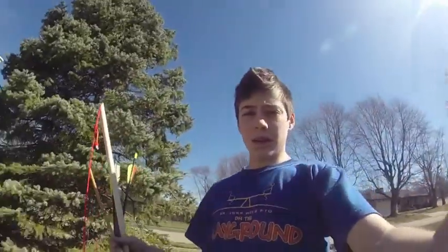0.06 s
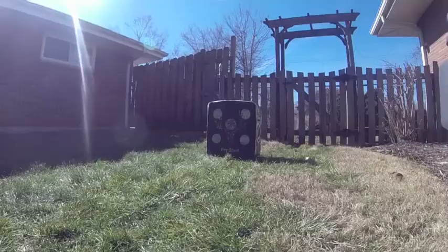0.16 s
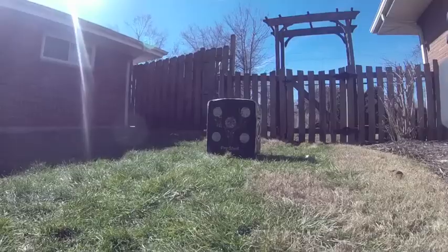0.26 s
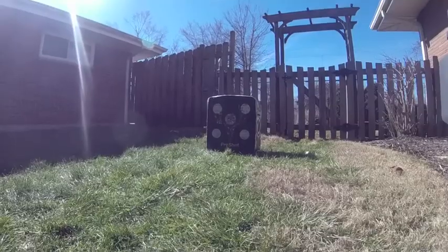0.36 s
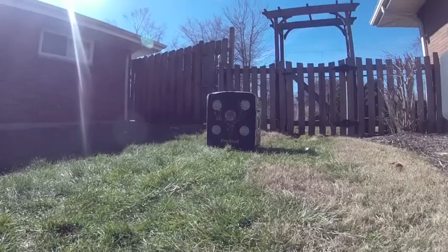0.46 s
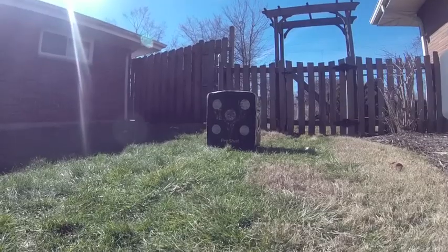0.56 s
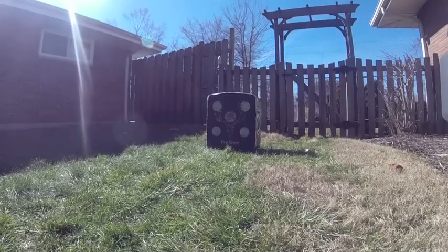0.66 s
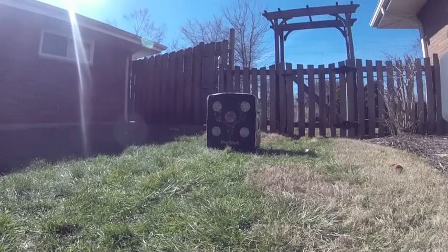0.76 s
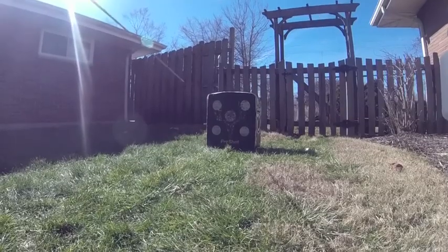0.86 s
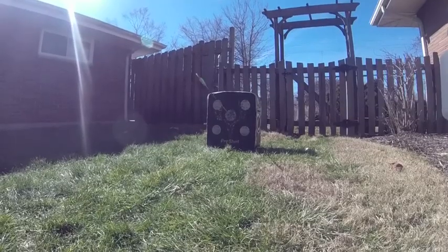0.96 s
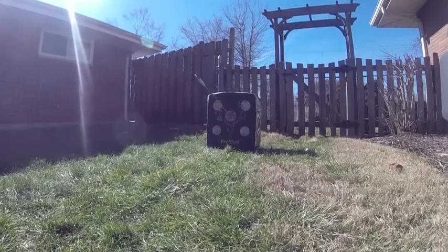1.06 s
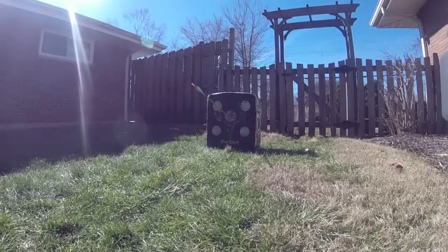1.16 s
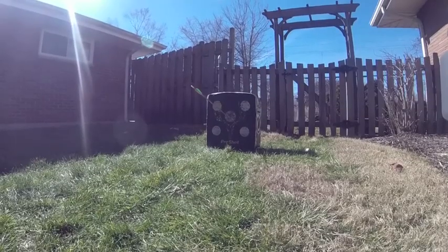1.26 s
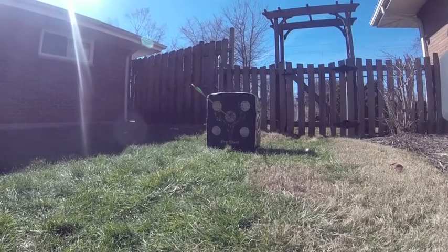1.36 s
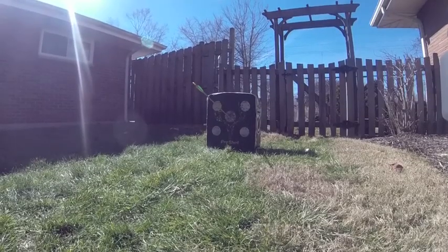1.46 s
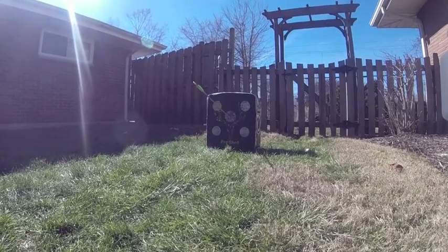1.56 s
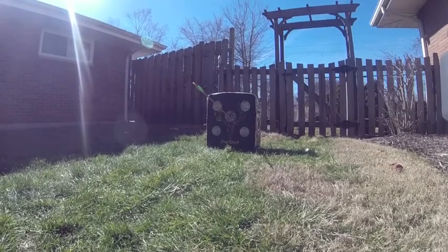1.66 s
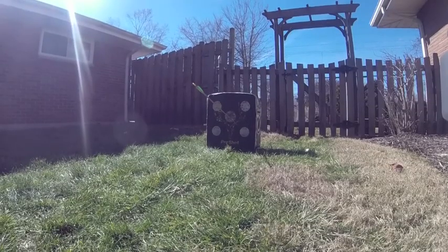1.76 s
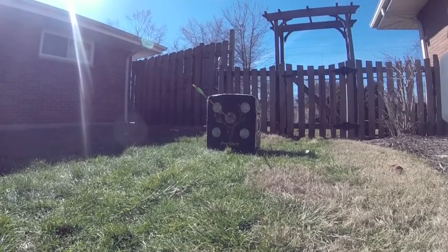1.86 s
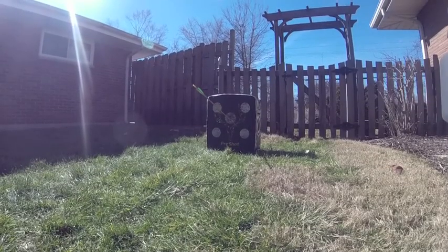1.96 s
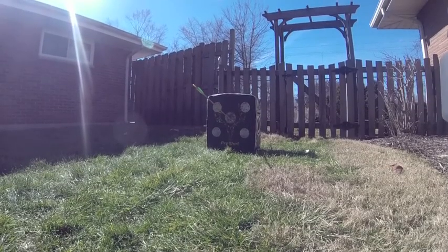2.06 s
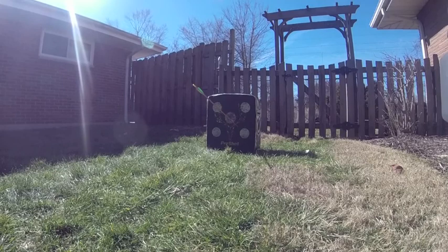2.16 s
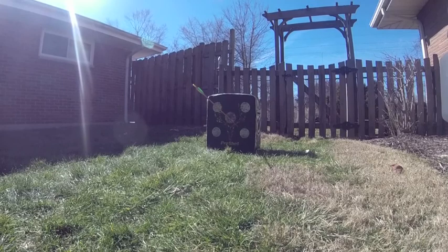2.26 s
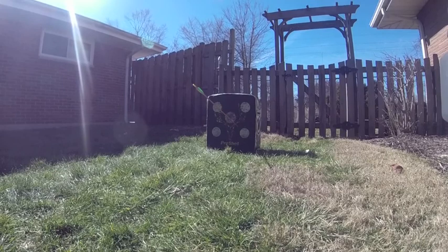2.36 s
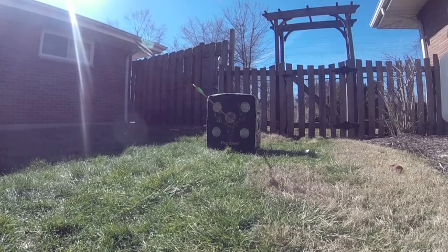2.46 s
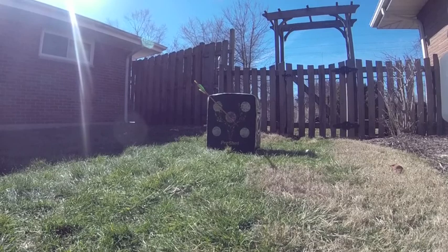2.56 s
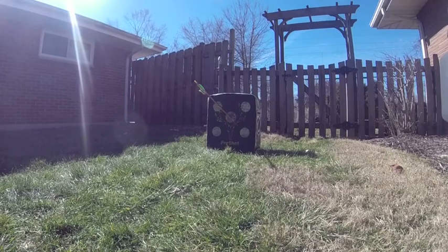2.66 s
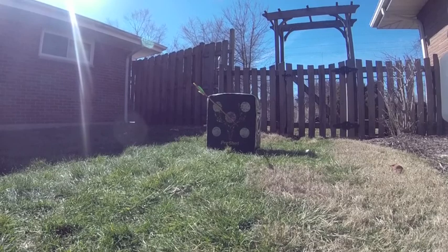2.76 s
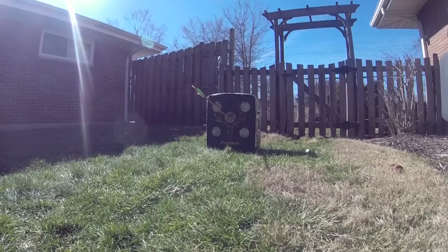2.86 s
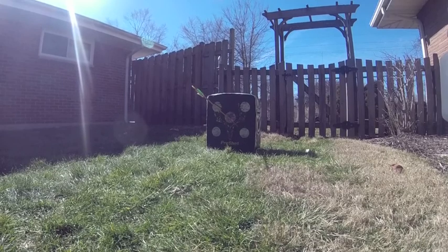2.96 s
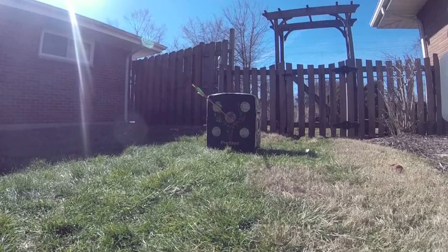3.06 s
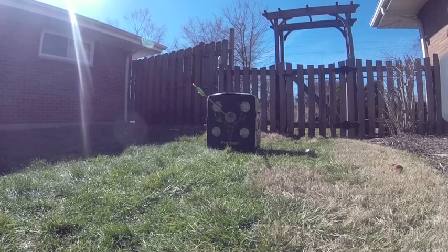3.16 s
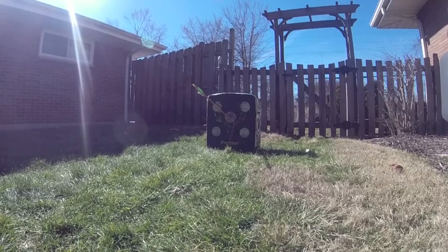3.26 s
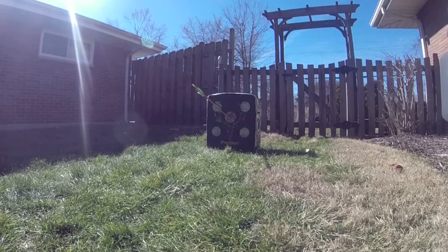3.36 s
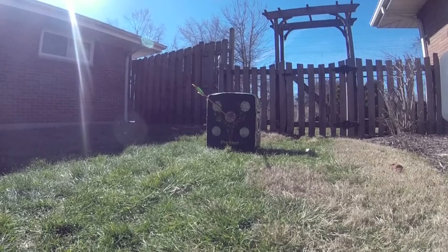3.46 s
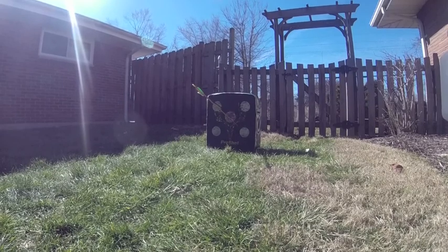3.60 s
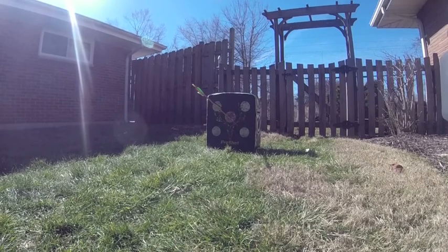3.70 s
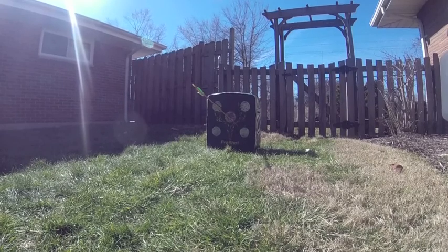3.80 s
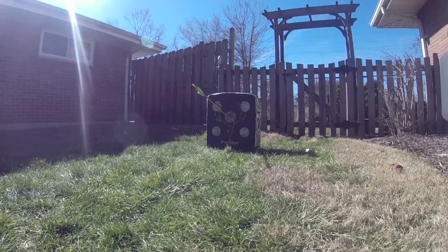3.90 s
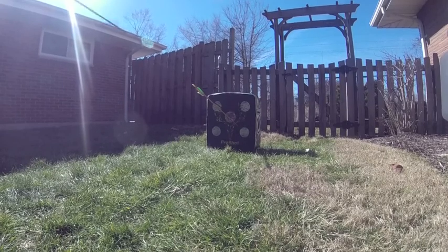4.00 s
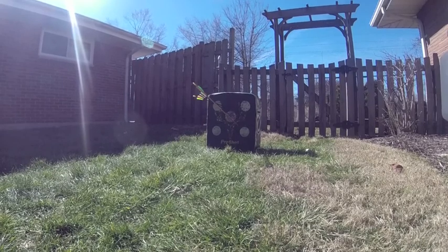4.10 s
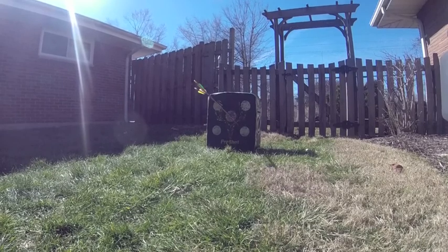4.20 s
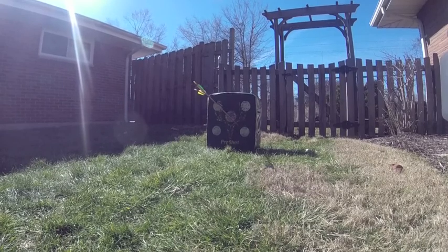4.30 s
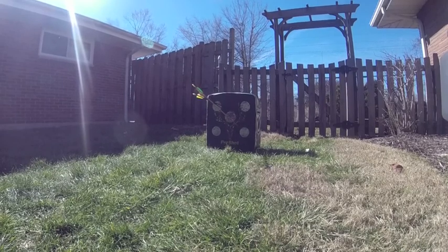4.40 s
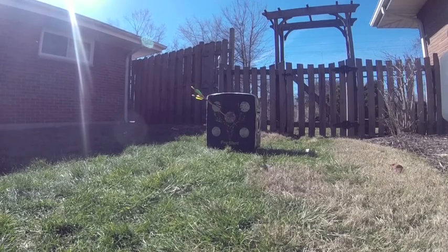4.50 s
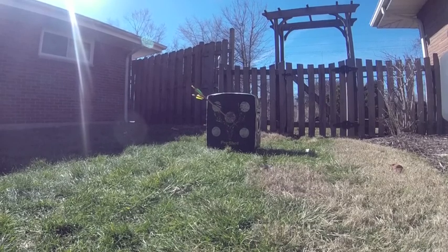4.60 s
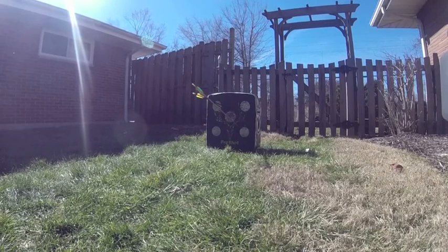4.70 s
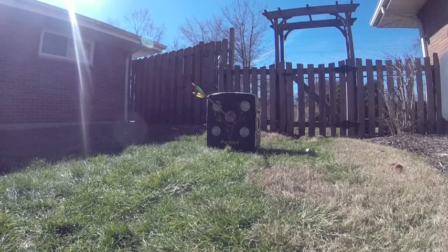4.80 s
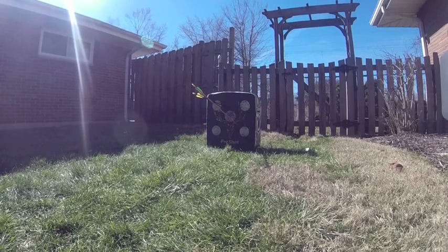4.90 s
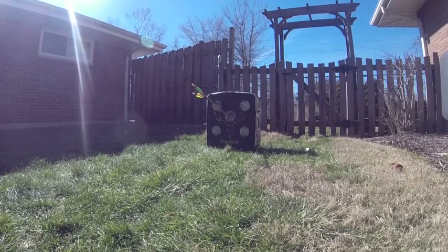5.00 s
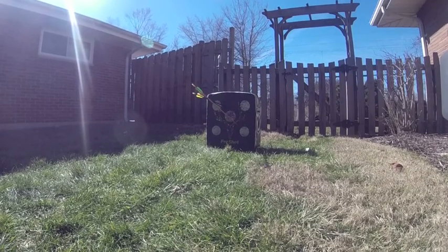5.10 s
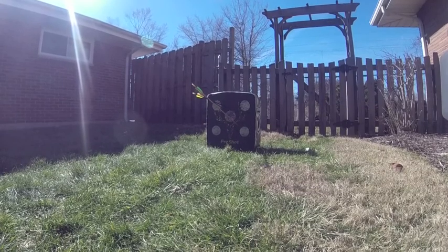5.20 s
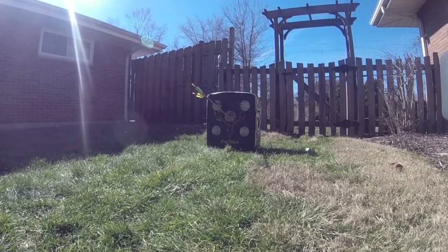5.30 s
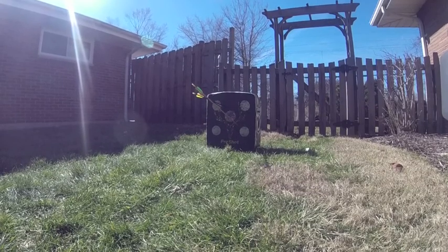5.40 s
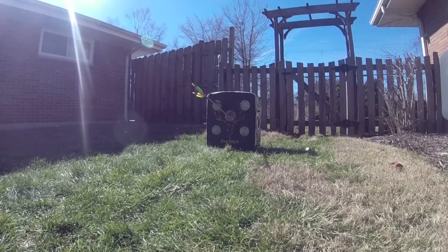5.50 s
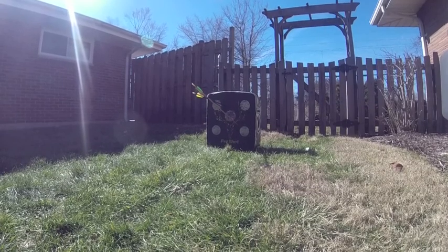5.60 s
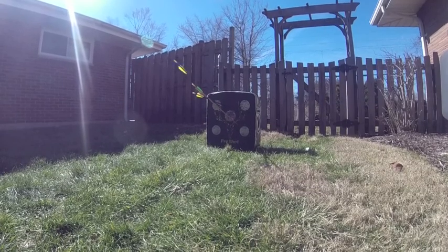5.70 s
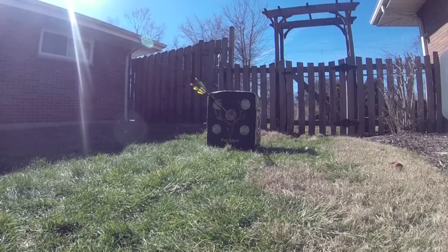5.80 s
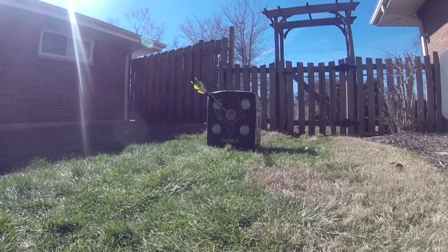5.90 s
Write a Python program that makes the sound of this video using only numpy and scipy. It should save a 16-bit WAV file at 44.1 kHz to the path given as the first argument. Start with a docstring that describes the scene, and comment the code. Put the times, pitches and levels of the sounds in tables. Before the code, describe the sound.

At the very start a finger presses a button on a small plastic camera case, right at the microphone: a low push and rocking bump, faint gritty rubbing, then a sharp, loud snap at 0.13 s, cut off at about 0.18 s. A quiet yard fades in, with smooth far traffic, air and hiss. At 0.82 s an arrow chatters and scrapes off the bow with a tiny squeak, then smacks into foam at 0.93 s with the fullest thud. The background dips near 1.9 s. A second shot scrapes and squeals most clearly at 2.4 s and hits at 2.51 s. After a dip at 3.5 s, the third scrapes at 3.95 s, strikes at 4.08 s and rattles brightly against a standing arrow until about 4.2 s. Another dip at 5 s; the fourth scrapes more softly at 5.59 s, lands at 5.74 s and ticks faintly until 5.95 s. Short dull reflections follow every shot.

```python
"""Arrows into foam, quiet yard

A button snaps on a small camera's plastic case, close on its microphone: ringing modes, a slow push, rubbing noise.
Then the camera lies in the yard for four takes joined by short fades. In each, an arrow scrapes and chatters off
the bow (noise swarms through shaft modes, at times singing sines), flies a tenth of a second and smacks into a
foam block (bright grit, a thud of block modes), where its shaft may rattle against the arrows already there.
Dull echoes of fence and walls follow each shot, over smooth noise of far traffic, air and hiss."""
import sys
import numpy as np
from scipy import signal
from scipy.fft import rfft, irfft
from scipy.io import wavfile
from scipy.ndimage import uniform_filter1d

SR = 44100
rng = np.random.default_rng(int(sys.argv[2]) if len(sys.argv) > 2 else 0)


def digitize_waveform(pressure):
    """Quantize a signal to 16-bit integers and store it at the path in sys.argv[1].

    Rows of a 2-D input are taken as channels; values are limited to [-1, 1].
    """
    field = np.atleast_2d(pressure).T
    bounded = np.clip(field, -1, 1)
    quanta = np.round(bounded * 32767).astype(np.int16)
    wavfile.write(sys.argv[1], SR, quanta)


N = 262350
T = np.arange(N) / SR

# the loudest slips of the shaft over the bow: (time [s], loudest level [dB], centre [Hz])
SLIPS = [(0.821, -43, 3230), (0.826, -33, 3280), (0.835, -37.5, 3050), (0.8457, -35.5, 3000),
         (0.854, -35.5, 3500), (0.8997, -42.5, 3500), (2.392, -43, 2300), (2.4009, -33, 2900),
         (2.4279, -28.5, 3140), (3.9486, -43, 3300), (3.9572, -34, 3160), (3.9853, -48, 2160),
         (5.5854, -45.5, 3170), (5.5954, -43, 2120), (5.5996, -36, 2160)]
# runs of small uneven slips: (start [s], end [s], first slip level [dB], last slip level [dB], centre [Hz])
DRAGS = [(0.800, 0.820, -57, -53, 2600), (0.848, 0.863, -42, -43, 3000), (2.403, 2.469, -44, -51, 2600),
         (3.958, 3.998, -43.5, -51.5, 2300), (5.604, 5.644, -45, -56, 2300)]
SLIP_T60_S, DRAG_T60_S = .03, .04
DRAG_GAP_S, DRAG_SPREAD_DB = .006, 2.5    # mean gap, spread of strength


def scrape():
    """The shaft sticks and slips along the bow, amid runs of smaller slips before, between and after."""
    out = np.zeros(N)
    for s, level_db, hz in SLIPS:
        add(out, s - .001, contact(level_db, hz, SLIP_T60_S, rise=.00055, ring_db=-5.5))
    for start, end, first_db, last_db, hz in DRAGS:
        luck = rng.standard_normal((14, 2))    # uneven timing, uneven strength
        times = start + DRAG_GAP_S * (np.arange(len(luck)) + .25 * luck[:, 0])
        levels_db = np.interp(times, [start, end], [first_db, last_db]) + DRAG_SPREAD_DB * luck[:, 1]
        for s, db in zip(times, levels_db):
            if s < end:
                add(out, s, contact(db, hz, DRAG_T60_S, rise=.001, ring_db=-7.0))
    return out


# the singing shaft: (start [s], hold [s], level [dB], pitch [multiple of the free modes])
SQUEALS = [(0.8213, 0.0084, -32, 1.052), (2.399, 0.023, -30, 1.0), (3.956, .004, -38, 1.04)]
# singing strength of five shaft modes: (level [dB])
SQUEAL_SHARE_DB = [-22, 0, -11.5, -16, -18]
SQUEAL_ATTACK_S = .002
SQUEAL_DROP_DB, SQUEAL_DAMP_S, SQUEAL_T60_S = -11, .004, .09    # damping depth and time; ring of the rest


def squeal():
    """Five shaft modes sing as sines, drop quickly as the shaft is damped, and ring out."""
    out, t = np.zeros(N), T[:6000]
    singing_hz = [SHAFT_MODES[k][0] for k in (0, 3, 5, 6, 8)]
    for s, hold, level_db, pitch in SQUEALS:
        damped = np.maximum(t - hold, 0)
        fall_db = SQUEAL_DROP_DB * np.minimum(damped / SQUEAL_DAMP_S, 1) - 60 * damped / SQUEAL_T60_S
        song = 0
        for hz, share_db in zip(singing_hz, SQUEAL_SHARE_DB):
            song = song + amp(share_db) * np.sin(2 * np.pi * (pitch * hz * t + rng.random()))
        swell = np.minimum(t / SQUEAL_ATTACK_S, 1)
        add(out, s, swell * amp(level_db + fall_db) * song)
    return out


# arrow enters the foam: (time [s], smack level [dB], smack centre [Hz], thud peak [dB], thud centre [Hz])
SMACKS = [(0.93, -33.5, 3400, -33.5, 235), (2.5125, -34.5, 2100, -39, 255), (4.0804, -34, 2870, -40, 700),
          (5.7354, -35, 2960, -41.5, 310)]
SMACK_HOLD_S, SMACK_T60_S = .0032, .018
QUIVER_DB, QUIVER_HZ, QUIVER_T60_S = -14, 2500, .16    # level relative to the smack


def smack():
    """The tip grinds in at full strength and stops; the shaft goes on quivering in the foam."""
    out = np.zeros(N)
    for s, smack_db, hz, _, _ in SMACKS:
        add(out, s - .001, contact(smack_db, hz, SMACK_T60_S, rise=.00019, ring_db=-4.5, hold=SMACK_HOLD_S))
        add(out, s, contact(smack_db + QUIVER_DB, QUIVER_HZ, QUIVER_T60_S, rise=.0018, ring_db=1.0))
    return out


# foam block modes: (frequency [Hz], level [dB])
BLOCK_MODES = [(110, -9), (180, -4), (270, 0), (450, -1), (650, -5), (900, -8), (1250, -11), (1850, -14)]
BLOCK_CYCLES = 4.5    # each mode falls 60 dB in this many cycles
THUD_RISE_S, THUD_T60_S, THUD_LOW_HZ, THUD_TOP_HZ = .0016, .083, 127, 2000


def thud():
    """Foam grips the shaft in jerks that drive the block's modes; the thud builds over a few ms."""
    out = np.zeros(N)
    band = signal.butter(1, [THUD_LOW_HZ, THUD_TOP_HZ], "band", fs=SR)
    for s, _, _, thud_db, thud_hz in SMACKS:
        jerks = rng.standard_normal(6000) * amp(4.3 * rng.exponential(1, 6000))
        braking = jerks * dying(THUD_T60_S, THUD_RISE_S, size=6000)
        block = 0
        for f, db in BLOCK_MODES:
            weight = amp(db - abs(np.log2(f / thud_hz)))    # modes fade away from the centre
            block = block + weight * rms_one(ring(braking, f, BLOCK_CYCLES / f))
        block = signal.lfilter(*band, block)
        add(out, s + .00115, amp(thud_db) * block / np.abs(block).max())
    return out


# shaft knocks on its neighbours: (time [s], loudest level [dB], centre [Hz])
RATTLES = [(4.1007, -32, 5170), (4.126, -38.5, 5200), (4.155, -40.5, 4760), (4.1762, -41.5, 4500),
           (5.7802, -49, 2910), (5.791, -47, 2870), (5.8087, -49, 4830), (5.8307, -40.5, 4500),
           (5.8537, -47, 5360), (5.923, -43.5, 5300), (5.9424, -49, 5260)]
RATTLE_HOLD_S, RATTLE_T60_S = .0016, .03
FREE_HZ, FREE_DB, FREE_T60_S = 8750, -25, .06    # level relative to the knock


def rattle():
    """The shaft knocks on standing arrows; a high mode of theirs rings on after each knock."""
    out = np.zeros(N)
    free_ring = np.sin(2 * np.pi * FREE_HZ * T[:4000]) * dying(FREE_T60_S, .00075)
    for s, level_db, hz in RATTLES:
        knock = contact(level_db, hz, RATTLE_T60_S, rise=.0003, ring_db=-5.5, hold=RATTLE_HOLD_S)
        add(out, s - .0005, knock)
        add(out, s, amp(level_db + FREE_DB) * free_ring)
    return out


# free modes of the arrow shaft: (frequency [Hz], level [dB])
SHAFT_MODES = [(1836, -7), (2218, -4), (2750, -3), (3165, -1), (3500, -2), (3892, -5), (4678, -3),
               (5200, -4), (5620, -4), (6300, -7), (7041, -10), (8613, -14)]
# colour of the bare contact noise: (frequency [Hz], relative level per Hz [dB])
CONTACT_COLOUR = [(900, -19), (1500, -9), (2200, -4), (3200, 2), (4000, -2.5), (5500, 6), (6800, -4.5),
                  (8000, -11.5), (12000, -20), (16000, -37)]
SHAFT_T60_S = .012


def contact(level_db, hz, t60, rise, ring_db, hold=0):
    """A swarm of tiny clicks, strongest near hz, heard directly and through the shaft's modes."""
    size = 4000

    def near(f):
        return -9.0 * np.log2(f / hz) ** 2    # the contact favours pitches near its own

    grit = rng.standard_normal(size) * amp(rng.exponential(1, size))
    spectrum = [(f, db + max(near(f), -5.0)) for f, db in CONTACT_COLOUR]
    grit = colour(grit, spectrum) * dying(t60, rise, hold=hold)
    # each grip on the shaft weights [dB] and shifts [share of pitch] its modes anew
    luck = rng.standard_normal((len(SHAFT_MODES), 2)) * [3, .04]
    rings = 0
    for (f, db), (extra_db, shift) in zip(SHAFT_MODES, luck):
        rings = rings + amp(db + near(f) + extra_db) * ring(grit, f * (1 + shift), SHAFT_T60_S)
    x = rms_one(grit) + amp(min(ring_db, 0)) * rms_one(rings)
    loudest = np.sqrt(uniform_filter1d(x ** 2, size=66).max())    # rms over 1.5 ms
    return amp(level_db) * x / loudest


# button snaps, close on the case: (time [s], ring drive [dB], crack peak [dB])
SNAPS = [(0.00353, -9.5, -62), (0.00407, -8.5, -58), (0.1200, -28, -38), (0.1289, -21, -13)]
# modes of the plastic case: (frequency [Hz], level [dB], t60 [s])
CASE_MODES = [(1270, -24, .03), (1745, -11, .0082), (2130, 0, .0079), (2649, -26, .015)]
PUSH_S, PUSH_DB, PUSH_T60_S = .0032, -3.4, .013    # drive before the filters


def snaps():
    """Snaps ring the case and drive the diaphragm in; noise gives the last a bright edge, the third a faint one."""
    out, t = np.zeros(N), T[:4000]
    case_ring = sum(amp(db - 60 * t / t60) * np.sin(2 * np.pi * hz * t) for hz, db, t60 in CASE_MODES)
    for s, ring_db, _ in SNAPS:
        add(out, s, -amp(ring_db) * case_ring)
    push = (1 - np.exp(-t / .00016)) * dying(PUSH_T60_S, .00016)
    add(out, PUSH_S, -amp(PUSH_DB) * push)
    out = signal.lfilter(*signal.butter(3, 5500, fs=SR), out)
    for s, _, crack_db in SNAPS:
        crack = signal.lfilter(*signal.butter(2, 6000, fs=SR), rng.standard_normal(len(t)))
        crack = crack * dying(.0057, .0001)
        add(out, s, amp(crack_db) * crack / np.abs(crack).max())
    return out


# finger load on the case: (start [s], end [s], level before the vent [dB])
SQUEEZE = (.105, .120, -23)


def squeeze():
    """Finger load builds on the case and lets go suddenly."""
    start, end, load_db = SQUEEZE
    build = np.clip((T - start) / (end - start), 0, 1) ** 1.5
    return -amp(load_db) * build * np.clip((end - T) / .0002, 0, 1)


# the press, then the finger letting go, rock the case: (time [s], level [dB], frequency [Hz], t60 [s])
SWAY_KICKS = [(.0022, -17.5, 26, 0.22), (.120, -32, 24.1, 0.14)]


def sway():
    """The case rocks in the hand as dying low sines."""
    out = np.zeros(N)
    for s, db, hz, t60 in SWAY_KICKS:
        since = np.maximum(T - s, 0)
        out += amp(db - 60 * since / t60) * np.sin(2 * np.pi * hz * since)
    return out


# finger strokes over the case: (start [s], end [s], level [dB])
RUB_STROKES = [(.004, 0.017, -52.5), (0.023, 0.063, -55.5), (0.072, 0.143, -54.5)]
# colour of the rubbing: (frequency [Hz], relative level per Hz [dB])
RUB_COLOUR = [(500, -13.5), (1000, -9), (1270, -1), (1650, -12), (2450, -0.5), (3200, -15), (4300, -9.5),
              (6500, -19), (13000, -28.5), (16000, -39.5)]
RUB_EDGE_S, RESTING_DB = .006, -71.5


def rub():
    """Gritty noise swells and fades with each finger stroke above a resting touch."""
    grit = rng.standard_normal(N) * amp(1.4 * rng.exponential(1, N))
    touch = amp(RESTING_DB)
    for start, end, db in RUB_STROKES:
        touch = touch + amp(db) * np.clip(np.minimum(T - start, end - T) / RUB_EDGE_S + .5, 0, 1)
    return touch * colour(grit, RUB_COLOUR)


VENT_HZ = 5.5    # pressure leak behind the diaphragm
FIRST_CUT_S = .175    # end of the hand-held take


def button():
    """Snaps and squeeze leak away through the vent; rocking and rubbing join until the cut."""
    pressure = signal.lfilter(*signal.butter(1, VENT_HZ, "high", fs=SR), snaps() + squeeze())
    return (pressure + sway() + rub()) * np.clip((FIRST_CUT_S - T) / .0005, 0, 1)


# fence and walls: (delay [s], level [dB])
ECHOES = [(.015, -19), (.029, -19), (.045, -21), (.063, -23)]


def echoes(x):
    """A few dull reflections, each scattered by its own rough surface."""
    dull, out = signal.lfilter([.3], [1, -.7], x), np.zeros(N)
    for delay, db in ECHOES:
        scatter = rng.standard_normal(900) * dying(.04, .002, size=900)
        scatter = scatter / np.linalg.norm(scatter)
        add(out, delay, amp(db) * signal.fftconvolve(dull, scatter)[:N])
    return out


# colour of the quiet yard: (frequency [Hz], relative level per Hz [dB])
YARD_COLOUR = [(12, -16), (20, -4.5), (77, 0.5), (182, -4), (228, -5.5), (301, -7), (410, -9.5),
               (1370, -15.5), (2460, -17), (2910, -14.5), (3840, -22), (4670, -21), (6010, -26.5),
               (13500, -39.5), (16000, -44)]
YARD_DB = -58.5    # rms between the fades


def yard():
    """Far traffic, air and microphone hiss: smooth noise."""
    return amp(YARD_DB) * colour(rng.standard_normal(N), YARD_COLOUR)


def amp(db):
    """Decibels to a linear factor."""
    return 10 ** (np.asarray(db) / 20)


def rms_one(x):
    """Scales a sound to rms 1."""
    return x / np.sqrt(np.mean(x ** 2) + 1e-20)


def colour(x, spectrum):
    """Shapes steady noise to a (frequency [Hz], level [dB]) spectrum; rms 1."""
    hz, table = np.fft.rfftfreq(len(x), 1 / SR) + 1, np.array(spectrum)
    level_db = np.interp(np.log(hz), np.log(table[:, 0]), table[:, 1])
    return rms_one(irfft(rfft(x) * amp(level_db), len(x)))


def ring(force, hz, t60):
    """A two-pole resonator: a unit click sets a dying sine of height 1 ringing."""
    r, w = amp(-60 / (max(t60, .001) * SR)), 2 * np.pi * hz / SR
    return signal.lfilter([0, np.sin(w)], [1, -2 * r * np.cos(w), r * r], force + 1e-18)


def add(out, s, x):
    """Mixes a short sound in at time s."""
    i = round(s * SR)
    out[i:i + len(x)] += x[:N - i]


def dying(t60, rise, size=4000, hold=0):
    """Envelope: quick rise, hold, exponential fall."""
    t = np.arange(size) / SR
    return (1 - np.exp(-t / max(rise, 1e-5))) * amp(-60 * np.maximum(t - hold, 0) / max(t60, .001))


# quiet moments between the yard takes: (time [s])
JOINS = [1.859, 3.495, 4.961]
FADE_IN_S, FADE_S = .197, .105    # start of the first fade-in, ramp length


def scene():
    """The button close by, then the yard takes, dipping to a hundredth at each join."""
    shots = scrape() + squeal() + smack() + thud() + rattle()
    fades = np.clip((T - FADE_IN_S) / FADE_S, 0, 1)
    for s in JOINS:
        fades = fades * np.clip(np.abs(T - s) / FADE_S, .01, 1)
    return (button() + fades * (yard() + shots + echoes(shots)))[None]


CUTOFF_HZ = 16300    # 60 dB down from here up


def record(dry):
    """A steep low-pass cuts the top."""
    return signal.sosfilt(signal.cheby2(12, 60, CUTOFF_HZ, fs=SR, output="sos"), dry)


dry = scene()
out = record(dry)
digitize_waveform(out)
```